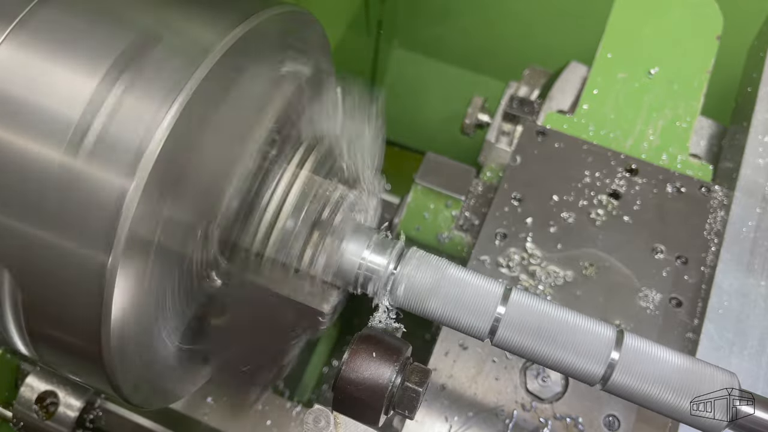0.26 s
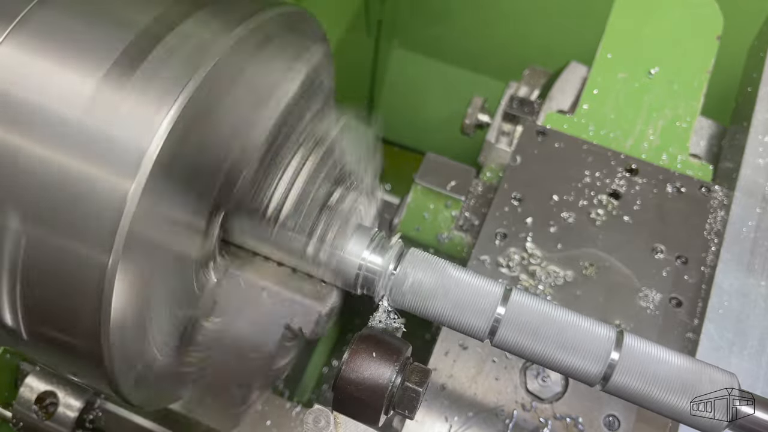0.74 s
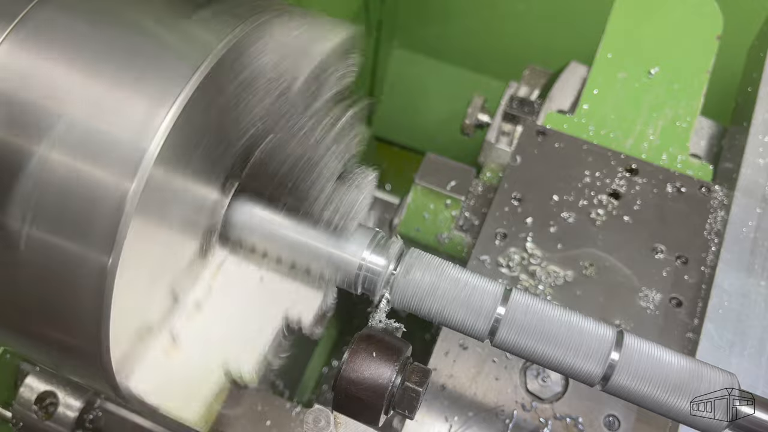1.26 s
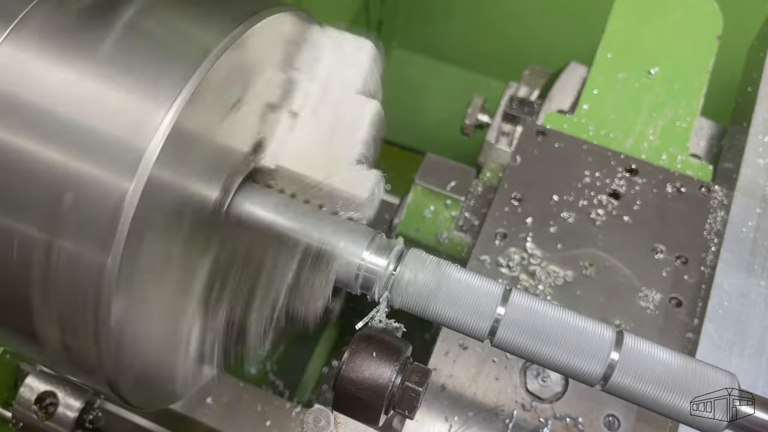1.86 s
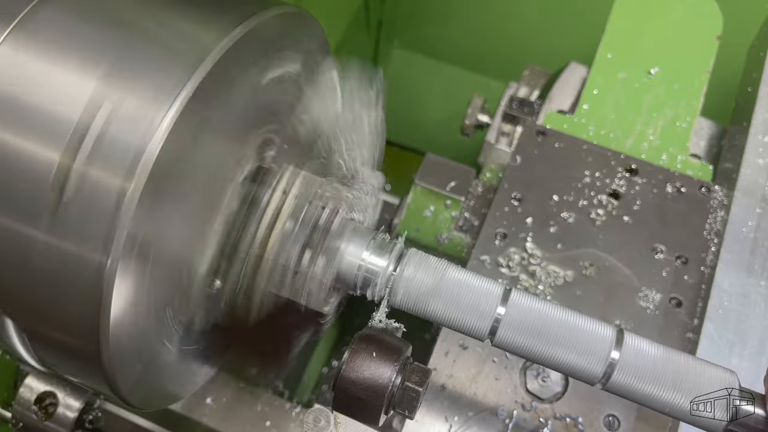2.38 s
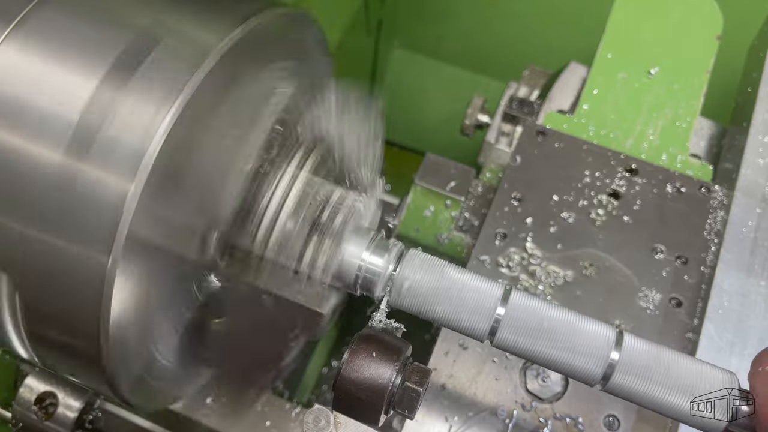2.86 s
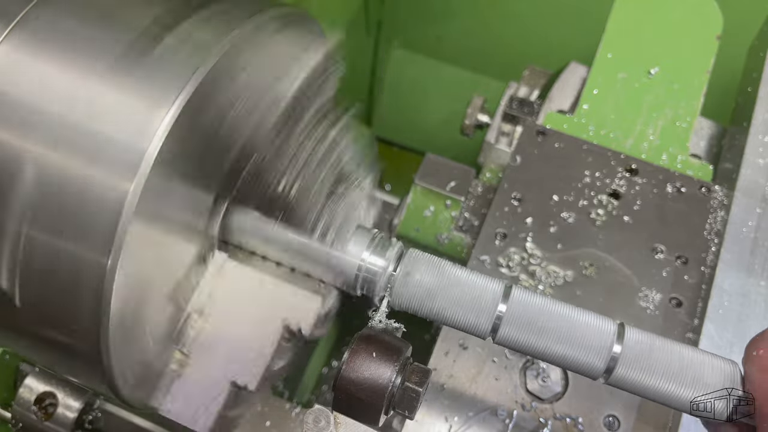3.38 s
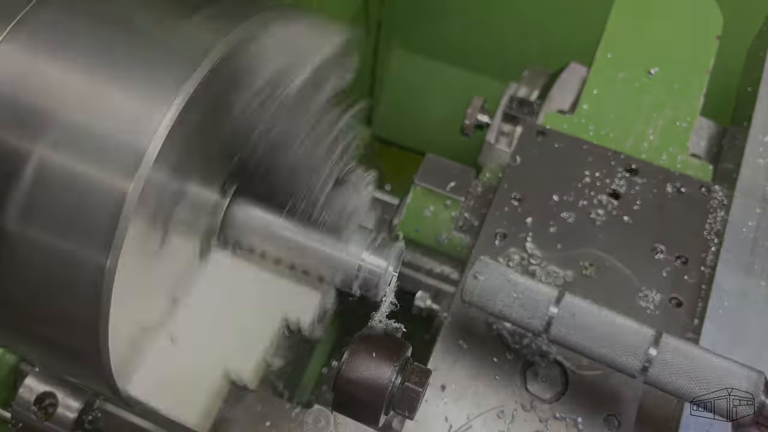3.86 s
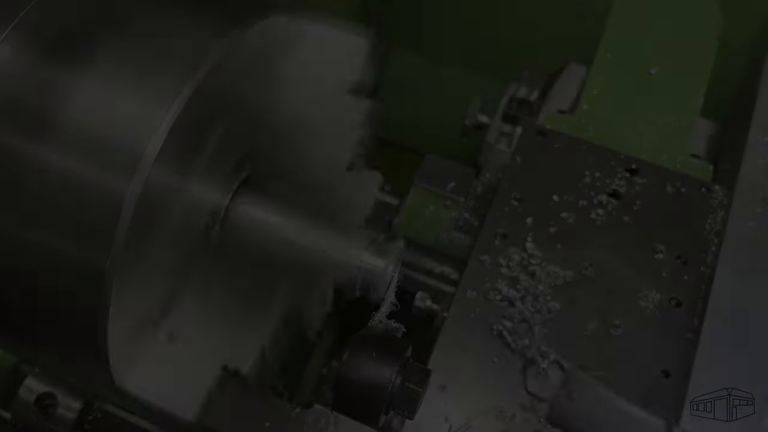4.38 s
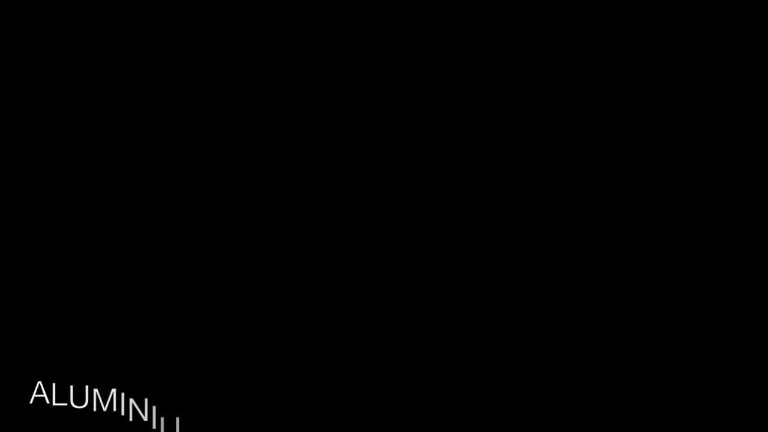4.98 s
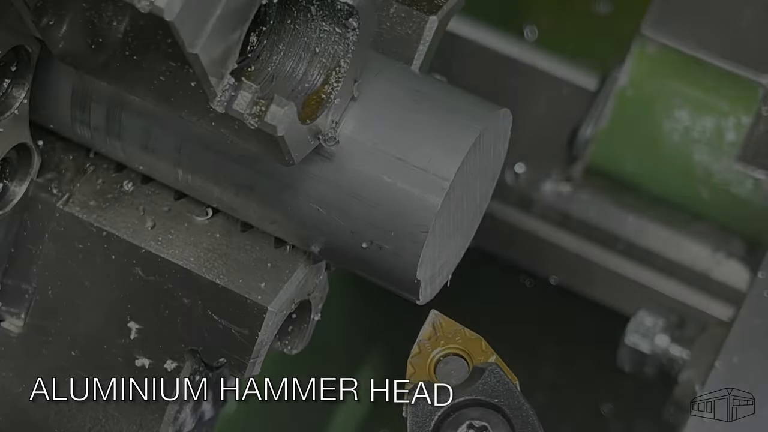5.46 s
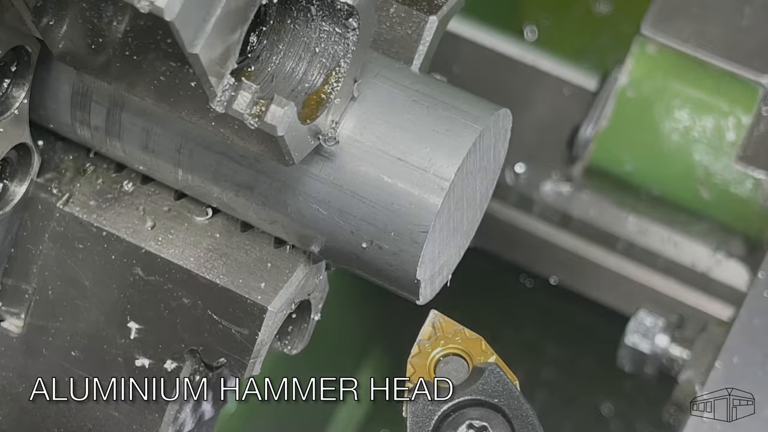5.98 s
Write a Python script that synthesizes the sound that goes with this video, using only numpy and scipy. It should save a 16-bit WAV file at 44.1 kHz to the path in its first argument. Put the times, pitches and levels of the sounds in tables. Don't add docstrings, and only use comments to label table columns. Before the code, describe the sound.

A geared metal lathe whines and throbs close by while a blade hisses and squeals in metal, then cuts free and the machine fades.

```python
import sys
import numpy as np
from scipy import signal
from scipy.fft import rfft, irfft, next_fast_len
from scipy.io import wavfile
from scipy.ndimage import uniform_filter1d, map_coordinates

SR = 44100
rng = np.random.default_rng(int(sys.argv[2]) if len(sys.argv) > 2 else 0)


def undo_db(level):
    steps = np.asarray(level, float) / 20
    return 10 ** steps


def dump(signal):
    limited = np.clip(np.atleast_2d(signal).T, -1, 1)
    pcm = np.round(limited * 32767).astype(np.int16)
    wavfile.write(sys.argv[1], SR, pcm)


N = 274731
TIME = np.arange(N) / SR

MESH_HZ, SHAFT_HZ, SPINDLE_HZ, IDLER_HZ, PAIR_HZ = 348.27, 43.09, 7.22, 9.37, 423.56


def unit(x):
    return x / np.sqrt(np.mean(x ** 2) + 1e-20)


def along(points, hz):
    f, v = np.transpose(points)
    return np.interp(np.log(hz + 1), np.log(f + 1), v)


def wobble(rate):
    knots = rng.standard_normal(int(N * rate / SR) + 4)
    return map_coordinates(knots, [np.arange(N) * rate / SR])


def filtered(x, response):
    m = next_fast_len(N + SR // 2)
    spectrum = rfft(x, m) * response(np.fft.rfftfreq(m, 1 / SR))
    return irfft(spectrum, m)[..., :N]


def hump(f, hz, width):
    return 1j * f * width / (hz * hz - f * f + 1j * f * width)


def ringing(x, modes):
    def response(f):
        return sum((-1) ** k * undo_db(db) * hump(f, hz, w) ** 2 for k, (hz, w, db) in enumerate(modes))
    return filtered(x, response)


def paired(a, b):
    # f/Hz, correlation [0..1]
    likeness = [(60, 1), (310, 0.95), (600, 0.54), (1300, 0.34), (1800, 0.14), (3900, 0.84), (5300, 0.35),
                (6300, 1), (6900, 0.088), (8200, 0.99), (12000, 0.75), (12900, 0.17)]

    def mid_side(f):
        turn = np.arccos(np.clip(along(likeness, f), -1, 1)) / 2
        return np.array([np.cos(turn), np.sin(turn)])
    mid, side = filtered(np.array([a, b]), mid_side)
    return np.array([mid + side, mid - side])


def tone(phase, left_db, right_db, lead, unsteady_db):
    level = undo_db(4.0 + unsteady_db * wobble(3.02))
    return level * undo_db([[left_db], [right_db]]) * np.cos(phase + np.array([[lead / 2], [-lead / 2]]))


def gears():
    # tooth multiple, shaft sideband, left level/dB, right level/dB, left lead/rad
    whine_lines = [(1, 0, -43, -43, 0), (1, 1, -55, -65, .7), (2, 0, -39, -56, 2.3), (2, 1, -50, -50, 0),
                   (3, -1, -54, -46, -.7), (3, 0, -40, -43, -2), (3, 1, -39, -41, -.1),
                   (4, -1, -43, -42, 0), (4, 0, -40, -38, .5), (4, 1, -42, -48, -.6),
                   (5, -1, -43, -53, -.5), (5, 0, -38, -46, -2.8), (5, 1, -47, -56, 1.3),
                   (6, -1, -54, -70, -1.5), (7, -1, -61, -71, .8), (7, 0, -61, -65, -.4),
                   (8, 0, -60, -70, -.1)]
    spindle_up = [(3, -1, -57, -57, .1), (3, 0, -50, -56, -.6), (3, 1, -50, -55, .1), (4, -1, -53, -52, .5),
                  (4, 0, -56, -51, 1.6), (4, 1, -53, -51, -.3), (5, 0, -48, -57, -1.8)]
    spindle_down = [(3, 0, -59, -51, 2.2), (4, 0, -52, -51, .3)]
    spindle_two_down = [(2, -1, -61, -55, .6), (3, -1, -63, -53, .8), (4, -1, -49, -65, 1.9),
                        (5, -1, -49, -51, -.2), (6, -1, -57, -68, -.8)]
    idler_down = [(4, -1, -53, -62, -1.4), (4, 0, -52, -55, .5), (4, 1, -51, -64, 2.7)]
    # tooth multiple, left level/dB, right level/dB, left lead/rad
    second_pair = [(2, -51, -52, .1), (3, -52, -56, 1.4), (4, -44, -48, .5), (5, -49, -51, .1),
                   (6, -59, -68, -.9), (7, -63, -77, .4), (8, -66, -64, 1.2), (9, -62, -69, .6)]
    # f/Hz, left level/dB, right level/dB, left lead/rad
    further_tones = [(100, -58, -56, 0), (129.3, -56, -51, -.2), (227.5, -57, -58, 0), (299.9, -50, -53, .5),
                     (621.2, -55, -56, -.5), (680.7, -54, -51, .2), (796.5, -55, -54, .1), (871.2, -54, -55, .2),
                (896.5, -47, -50, 1), (907.6, -44, -64, -3), (921.4, -48, -59, .5), (969.5, -56, -52, .3),
                (1117.4, -51, -62, -.4), (1120.1, -50, -58, -.6), (1134.6, -51, -53, 0),
                (1227.6, -56, -59, -1.3), (1346, -57, -54, -1.2), (1468.4, -56, -59, 2.9)]

    tooth = 2 * np.pi * MESH_HZ * TIME - 0.2
    shaft = 2 * np.pi * SHAFT_HZ * TIME + 2.3
    spindle = 2 * np.pi * SPINDLE_HZ * TIME + 4.3
    idler = 2 * np.pi * IDLER_HZ * TIME + 1.8
    smear = 0.6944
    families = [(whine_lines, 0), (spindle_up, spindle), (spindle_down, -spindle),
                (spindle_two_down, -2 * spindle), (idler_down, -idler)]
    sound = np.zeros((2, N))
    for rows, shift in families:
        for k, m, *rest in rows:
            sound += tone(k * tooth + smear * k * k + m * shaft + shift, *rest, 0.75)
    sound += tone(2 * np.pi * 49.95 * TIME + 1.9, -55, -54, 0, 2.4)
    free = further_tones + [(k * PAIR_HZ, *rest) for k, *rest in second_pair]
    for hz, *rest in free:
        sound += tone(2 * np.pi * hz * TIME + rng.uniform(0, 2 * np.pi), *rest, 1.0)
    return sound


def ripple(f):
    depth_db, spacing_hz, own = 2.0, 28, 0.7
    knots = rng.standard_normal((3, int(SR / 2 / spacing_hz) + 4))
    both, left, right = (map_coordinates(row, [f / spacing_hz]) for row in knots)
    uneven = np.sqrt(1 - own) * both + np.sqrt(own) * np.array([left, right])
    return undo_db(depth_db * (f > 2250) * (f < 8000) * uneven)


def casing():
    # f/Hz, level/dB per Hz
    rush = [(20, -22), (40, -27), (70, -3), (120, -6), (300, -5.5), (800, -9), (1200, -3), (2000, -7),
            (2400, -11.5), (4200, -16.5), (5000, -22), (6800, -27), (8500, -34.5), (12500, -45)]
    # f/Hz, width/Hz, left level/dB, right level/dB
    panel_modes = [(678, 190, -5.5, -3), (950, 340, -10, -2), (1074, 91, 6, -5.5), (1222, 40, -3.5, -1.5),
                   (1367, 104, 2, 4.5), (1723, 192, 2, 0), (1959, 32, 2, 3), (2108, 72, 2.5, -10),
                   (3560, 470, -11.5, -26), (3894, 330, -9, -13), (4535, 137, -6.5, -14.5),
                   (5290, 220, -15, -28), (9540, 2200, -28.5, -30), (11130, 920, -28, -27.5)]

    same = 0.2
    turn = rng.standard_normal((2, round(SR / SPINDLE_HZ)))
    repeating = np.tile(turn, N // turn.shape[1] + 1)[:, :N]
    rattle = np.sqrt(1 - same) * rng.standard_normal((2, N)) + np.sqrt(same) * repeating
    shaft = 2 * np.pi * SHAFT_HZ * TIME + 2.9
    idler = 2 * np.pi * IDLER_HZ * TIME + 2.4
    throb_db = 1.9 * np.cos(shaft) + 1.25 * np.cos(idler)
    tooth_db = 0.79 * np.cos(2 * np.pi * MESH_HZ * TIME + 1.2)
    tooth_db += 0.6 * np.cos(2 * np.pi * PAIR_HZ * TIME + 0.2)
    unsteady_db = 0.63 * wobble(4.86) + 1.14 * wobble(60)

    noise = paired(*rattle)
    high = filtered(noise, lambda f: f ** 2 / (f ** 2 + 600 ** 2) / (1 + (f / 8000) ** 4))
    noise = noise - high + high * undo_db(throb_db + tooth_db + unsteady_db)

    def body(f):
        panels = sum(undo_db([[l], [r]]) ** 2 * abs(hump(f, hz, w)) ** 4 for hz, w, l, r in panel_modes)
        lean = undo_db(np.array([[1.2], [-1.2]]) * (f > 400) * (f < 7500))
        return ripple(f) * np.sqrt((lean * undo_db(along(rush, f))) ** 2 + panels)
    return undo_db(-30.5) * unit(filtered(noise, body))


def narrow(hz, width_hz, flutter_db):
    slow = filtered(rng.standard_normal((2, N)), lambda f: 1 / (1 + (f / width_hz) ** 2))
    phase = 2 * np.pi * np.cumsum(hz) / SR
    riding = slow[0] * np.cos(phase) + slow[1] * np.sin(phase)
    return unit(undo_db(flutter_db * wobble(30.1)) * riding)


def blade():
    # t/s, level/dB
    bite = [(0, -45), (.08, -47.5), (.25, -49), (1.05, -48.5), (1.13, -50), (1.2, -46), (1.5, -48.5),
            (1.7, -52), (2.14, -54), (2.42, -57.5), (2.6, -59), (2.72, -50.5), (2.84, -51.5), (3.13, -61),
            (3.29, -55.5), (3.5, -61), (3.55, -66), (3.75, -72)]
    # f/Hz, width/Hz, level/dB
    blade_modes = [(3680, 600, -2), (6100, 430, -4.5), (7530, 2000, -10.5), (9290, 910, 2), (10130, 990, 0),
                   (11380, 1700, -4), (12140, 540, -5.5)]
    # f/Hz, width/Hz, level/dB
    shank_modes = [(6200, 160, 0), (5800, 500, -17)]

    hiss_db = np.interp(TIME, *np.transpose(bite))
    chatter_s, chatter_end_s, chatter_rise_s = 1.68, 3.03, 0.15
    chatter = np.tanh((TIME - chatter_s) / chatter_rise_s)
    chatter = (chatter - np.tanh((TIME - chatter_end_s) / chatter_rise_s)) / 2
    ring_db = hiss_db - 12 + 12.5 * chatter + 4 * TIME
    squeal_start_hz, squeal_end_hz, squeal_sink_s = 6870, 6330, 0.95
    squeal_hz = squeal_end_hz + (squeal_start_hz - squeal_end_hz) * np.exp(-TIME / squeal_sink_s)
    squeal_db = hiss_db - 2
    whistle_hz = 3560 - 140 * TIME
    whistle_db = -43.5 - 9 * TIME
    cutting = np.clip((bite[-1][0] - TIME) / 0.15, 0, 1)

    tearing = undo_db(1.3 * wobble(250) + 1.16 * wobble(40) + 0.85 * wobble(9))
    hiss = unit(ringing(tearing * paired(*rng.standard_normal((2, N))), blade_modes))
    whistle = narrow(whistle_hz, width_hz=28, flutter_db=-0.5) * undo_db([[1.8], [-1.8]])
    bursts = undo_db(2.1 * wobble(45)) * rng.standard_normal(N)
    ring = unit(ringing(bursts, shank_modes)) * undo_db([[0.8], [-0.8]])
    squeal = narrow(squeal_hz, width_hz=130, flutter_db=2.5) * [[1.3], [-0.05]]
    sound = undo_db(hiss_db + 6.5) * hiss + undo_db(ring_db - 3.5) * ring
    sound += undo_db(squeal_db) * squeal + undo_db(whistle_db) * whistle
    return cutting * sound


def steadied(x, span):
    power = abs(uniform_filter1d(x ** 2, round(span * SR)))
    return unit(x / np.sqrt(power + 0.08 * np.mean(x ** 2)))


def bed():
    # t/s, length/s, level/dB, part that takes it [-1 stand, 0 bed, 1 tray, 2 guard]
    pushes = [(.22, 0.12, -34, 1.7), (.2, 0.15, -41, 0.17), (.33, 0.069, -27, 1.54),
              (.38, 0.11, -29.5, 0.16), (.65, .35, -35.5, -0.79), (.52, 0.31, -31, 0.32),
              (.6, 0.29, -28, 2), (.8, 0.39, -30, 1.25), (.91, .08, -40, 0), (1.04, .1, -43, 1.1),
              (1.14, .3, -49, -1.1), (1.53, 0.11, -38, 1.4), (1.66, 0.056, -32, 2), (1.66, .07, -33, 0),
              (1.73, .1, -41, 1), (1.78, .1, -33.5, 2), (1.8, 0.2, -32.5, 0.34), (1.93, 0.13, -33.5, .4),
              (1.92, 0.39, -40, -0.83), (2.33, 0.19, -33, 1.7), (2.4, 0.19, -37, 0.32),
              (5.35, .3, -50, -0.14), (4.14, 0.2, -34.5, 0.28), (4.22, 0.12, -39, 1.2),
              (4.35, 0.1, -32, 1.6), (4.47, 0.06, -36, 0.59), (4.53, 0.1, -29, 0.21), (4.61, .06, -38, 1.2),
              (4.69, 0.063, -32.5, 0.32), (4.8, 0.15, -30, 0.37)]
    # f/Hz, width/Hz, level/dB
    stand_modes = [(129.2, 12.5, 0)]
    bed_modes = [(153.8, 33, -1), (175, 81, -5)]
    tray_modes = [(257.7, 12.5, -1), (470, 210, -23.5)]
    guard_modes = [(289.9, 15.4, -0.5), (507, 150, -24)]

    let_go_s, resting_db = 4.83, -50
    spill_db = 11
    held = np.clip((let_go_s + 0.5 - TIME) / 0.68, 0, 1)
    s, length, db, taker = np.transpose(pushes)[:, :, None]
    swells = np.exp(-(2 * (TIME - s) / length) ** 2)
    shares = undo_db(db - spill_db * abs(taker - np.arange(-1, 3)))
    loads = undo_db(resting_db) + np.sqrt(shares.T ** 2 @ swells ** 2)
    drones = []
    for load, modes in zip(loads, (stand_modes, bed_modes, tray_modes, guard_modes)):
        drone = steadied(ringing(rng.standard_normal(N), modes), 0.069)
        drones.append(undo_db(-4.0) * load * drone)
    stand, low, tray, guard = drones
    sound = (stand + low) * undo_db([[-1.3], [0.9]])
    sound += tray * undo_db([[-1.2], [1.2]]) + guard * undo_db([[1.1], [-1.1]])
    return held * sound


def chips():
    # t/s, peak level/dB, lower ring level/dB
    strikes = [(0.5137, -27, -18), (1.533, -31, -18), (1.7424, -38, -4), (1.9101, -35, -3),
               (2.0453, -28, -1), (2.3974, -41, -5), (2.4384, -30, -8), (3.5157, -31, -18),
               (4.049, -35.5, -15), (4.1066, -37, -10), (4.1574, -38, -9), (4.4927, -34, -12),
               (4.778, -25.5, -5)]

    out = np.zeros(N + SR)
    t = np.arange(SR // 40) / SR
    bounce = 0.35 * (t > 0.003) * undo_db(-60 * t / 0.02)
    shape = undo_db(-60 * t / 0.0097) + bounce
    onset = 1 - np.exp(-t / 0.0002)
    for s, db, lower_db in strikes:
        phases = rng.uniform(0, 2 * np.pi, 3)
        ring = np.sin(2 * np.pi * 9200 * t + phases[0])
        ring += 0.97 * np.sin(2 * np.pi * 11400 * t + phases[1])
        ring += undo_db(lower_db) * np.sin(2 * np.pi * 6400 * t + phases[2])
        ring += 1.1 * rng.standard_normal(len(t))
        out[round(s * SR):][:len(t)] += undo_db(db - 2.0) * shape * ring * onset
    return filtered(out[:N], lambda f: hump(f, 8200, 11000))


def scene():
    fade_end_s, fade_length_s = 6.508, 1.71
    fade = np.clip((fade_end_s - TIME) / fade_length_s, 0, 1)
    return fade * (gears() + casing()) + blade() + bed() + chips()


def low_pass(x):
    return signal.sosfilt(signal.butter(12, 13450, fs=SR, output="sos"), x)


def record(dry):
    # f/Hz, phase/rad
    port_lead = [(2200, 0.26), (3300, 0.99), (4400, 0.014), (5000, 0.38), (7400, 0.97), (8500, 0.046)]
    # f/Hz, phase/rad
    treble_turn = [(8700, 0), (10000, -3.1), (10300, -3.2), (11800, -2 * np.pi)]

    def ports(f):
        lead = along(port_lead, f) + np.interp(f, *np.transpose(treble_turn))
        return np.exp(0.5j * np.array([[1], [-1]]) * lead) * (f < 13400)
    return low_pass(filtered(dry, ports))


dry = scene()
out = record(dry)
dump(out)
```